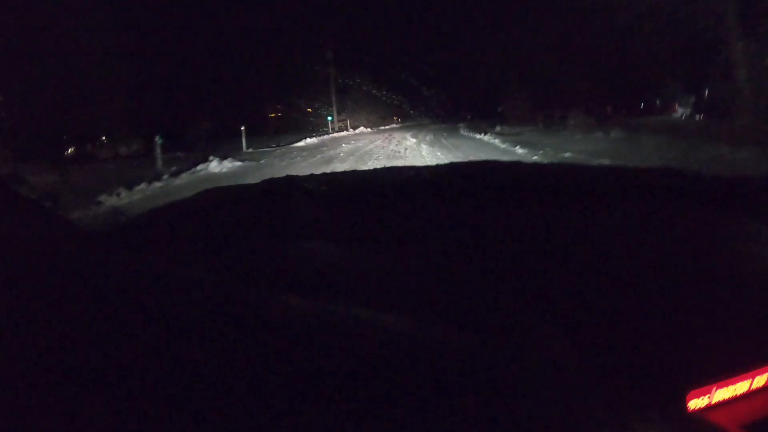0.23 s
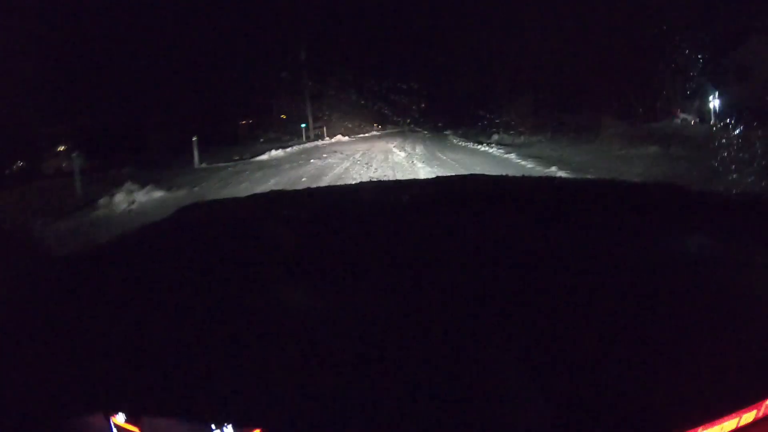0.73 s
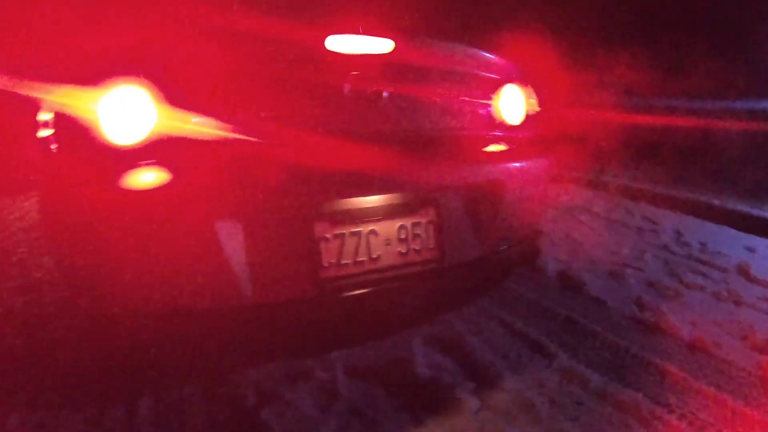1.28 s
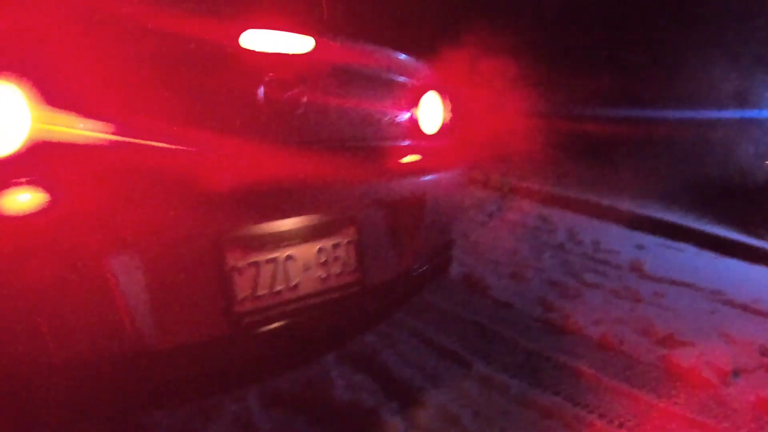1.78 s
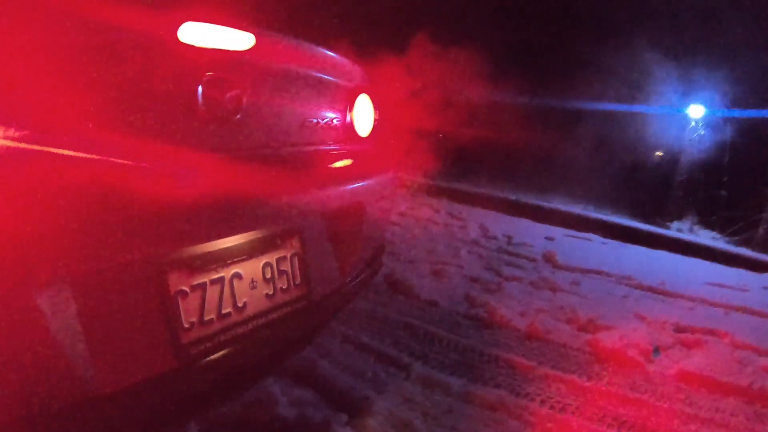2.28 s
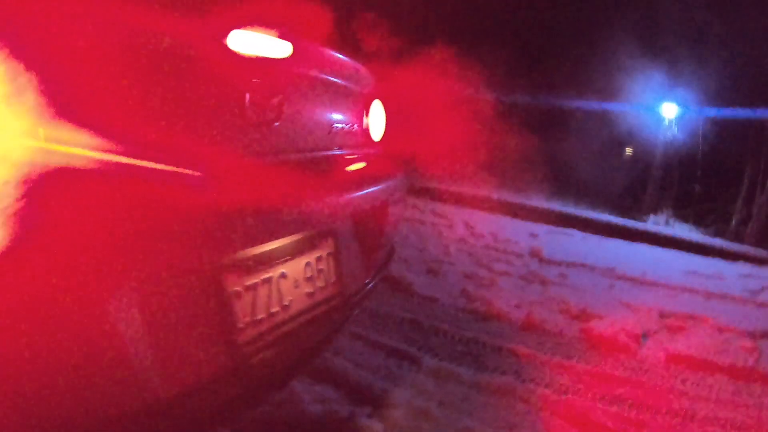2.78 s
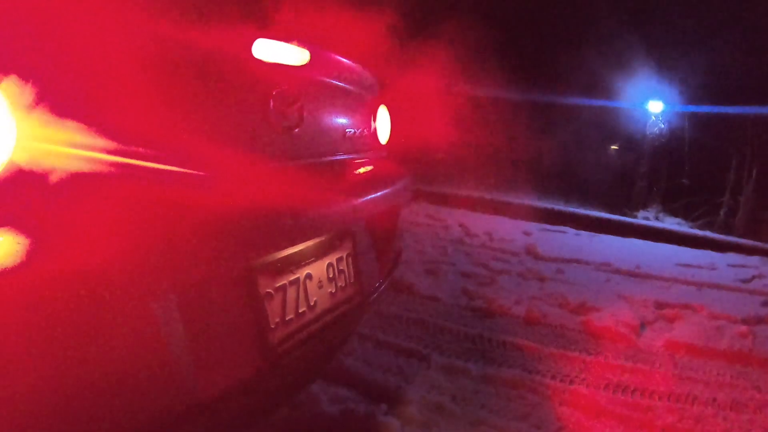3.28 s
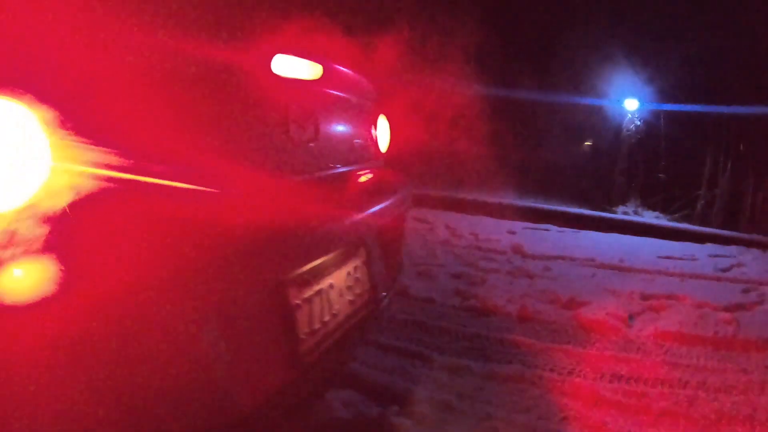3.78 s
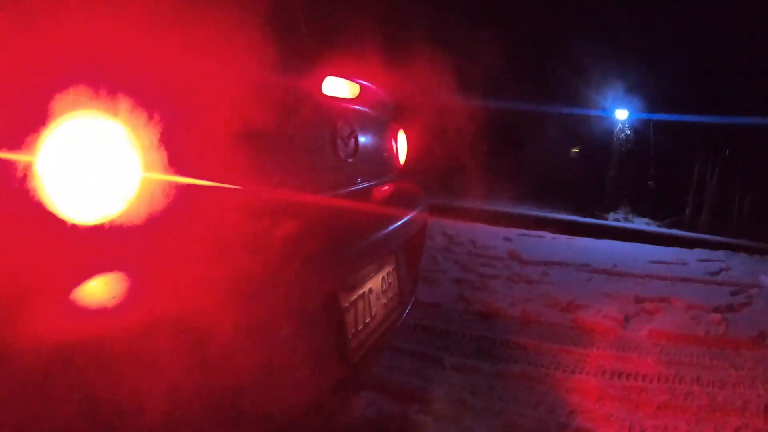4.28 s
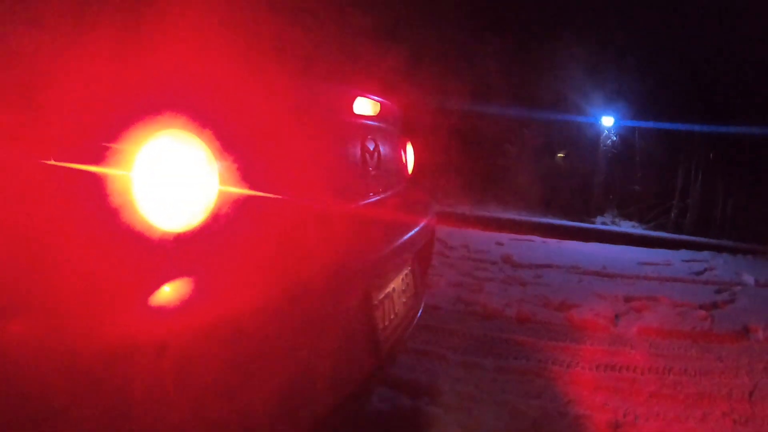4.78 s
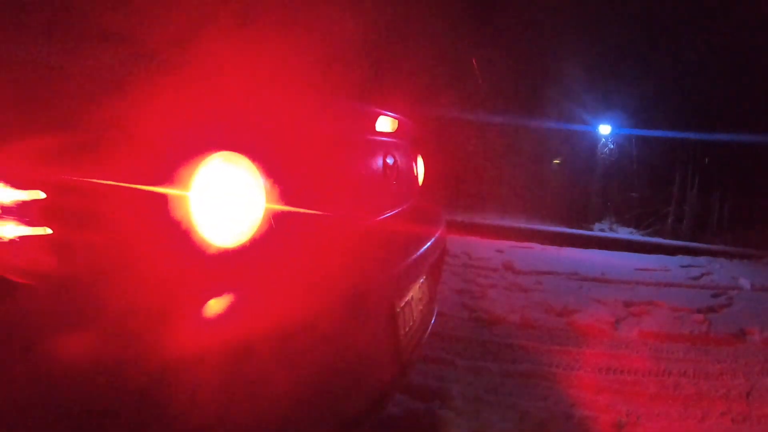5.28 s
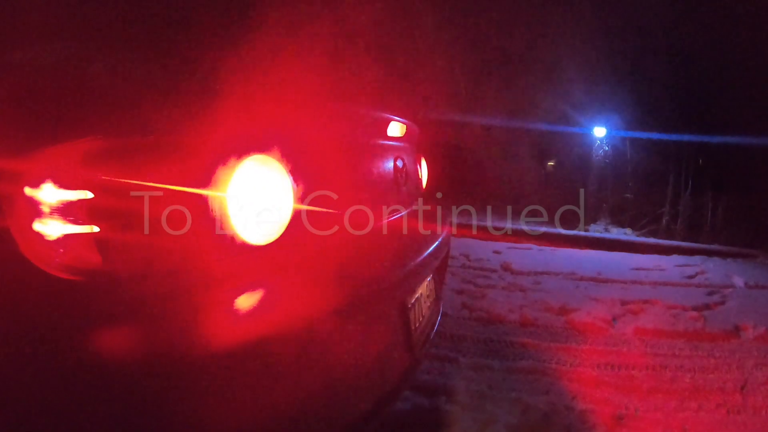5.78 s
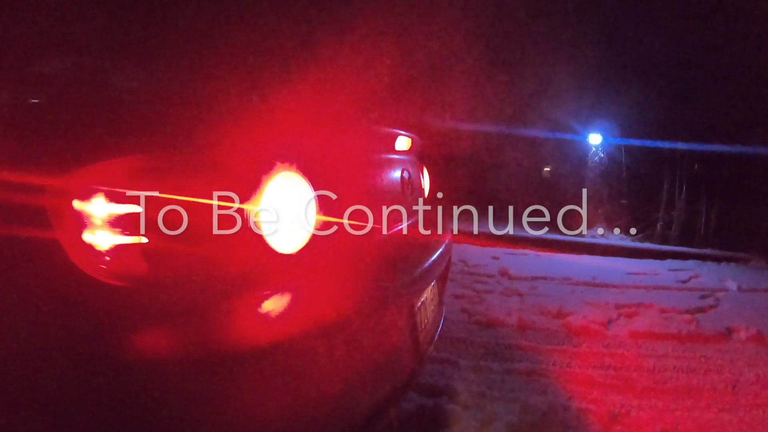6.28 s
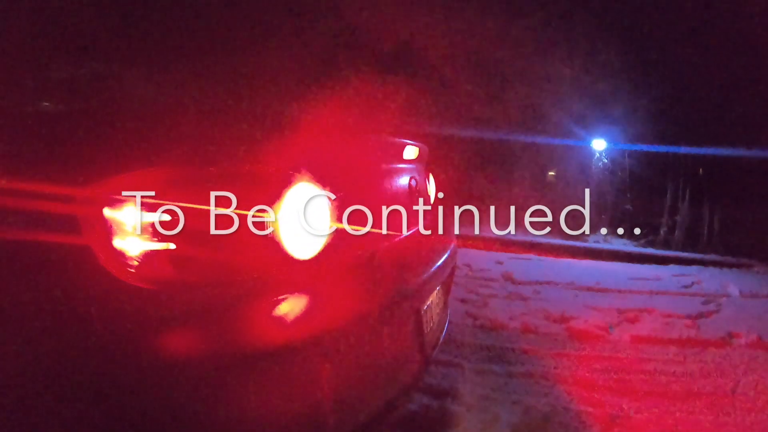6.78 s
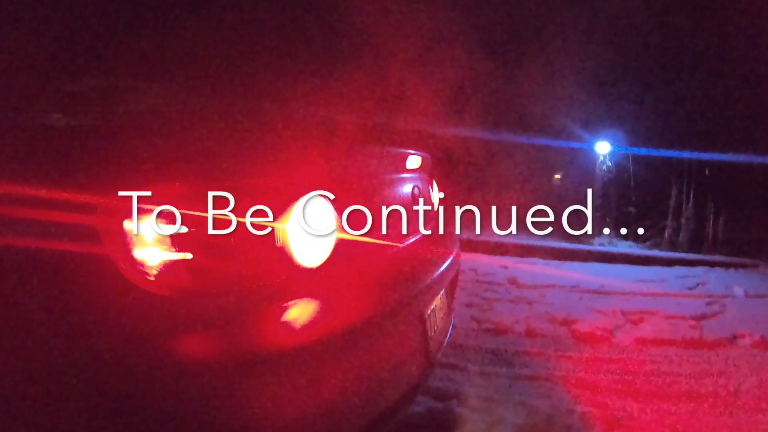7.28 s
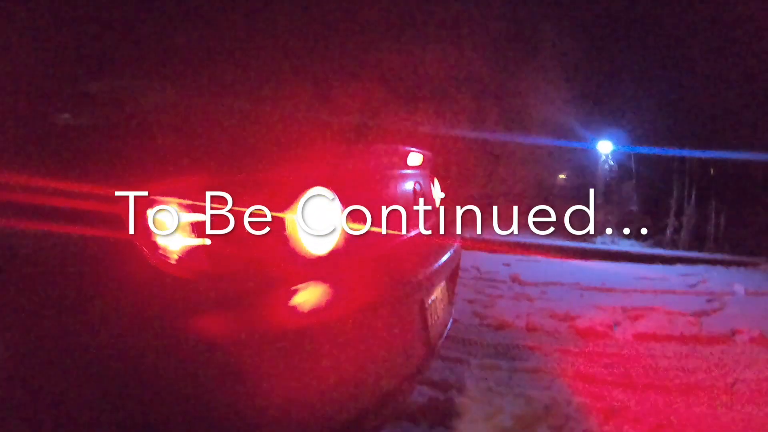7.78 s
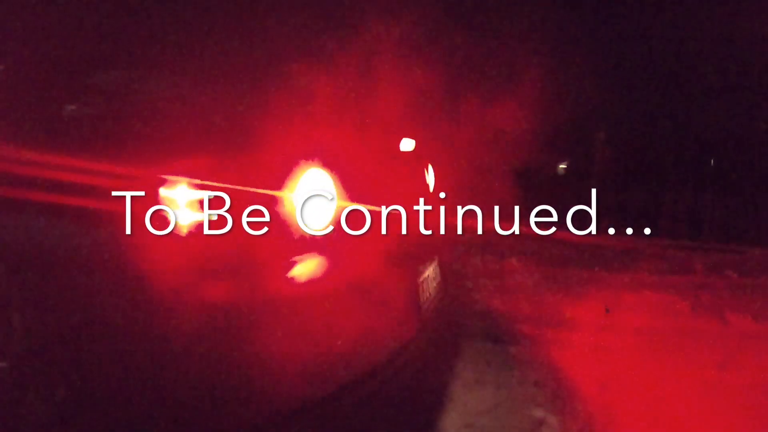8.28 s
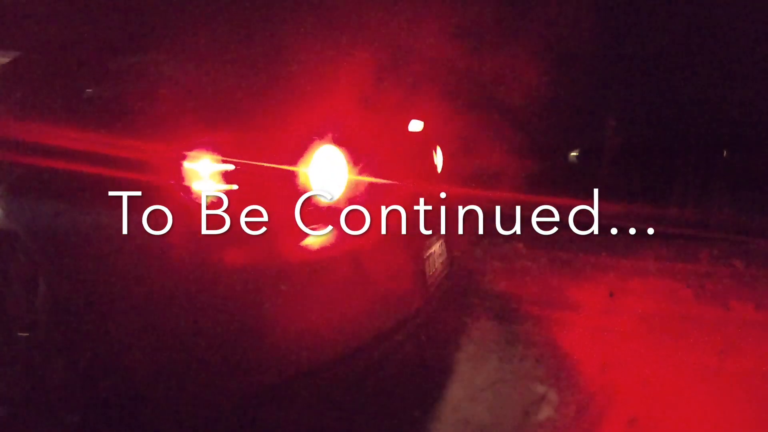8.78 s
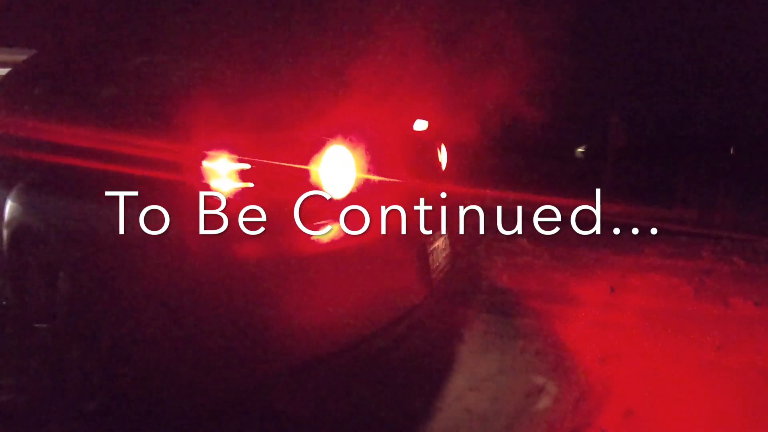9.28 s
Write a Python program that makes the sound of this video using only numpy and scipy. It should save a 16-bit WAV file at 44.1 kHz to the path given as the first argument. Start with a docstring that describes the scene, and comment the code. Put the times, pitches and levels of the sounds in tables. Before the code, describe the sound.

Low tyre rumble in a car cabin cuts to a close, throbbing idle at the tailpipes, with metallic ticking and microphone scuffs.

```python
"""One second of road rumble in a car's cabin on a snowy night, then a cut to its tail as it idles.
The rotary engine's strong and weak exhaust pulses alternate, ring the exhaust system and leave by two
tailpipes with a putt, a hiss and a metallic tick. The engine bay whirrs and whines behind them.
A hand-held camera is carried slowly round the rear corner, with scuffs and clicks by its right side."""
import sys
import numpy as np
from scipy import signal
from scipy.fft import rfft, irfft, next_fast_len
from scipy.io import wavfile

SR = 44100
rng = np.random.default_rng(int(sys.argv[2]) if len(sys.argv) > 2 else 0)


def bounce(signal):
    """Save signal as a 16-bit WAV file at the path given by the first command-line argument."""
    frames = np.transpose(np.atleast_2d(signal))
    limited = np.clip(frames, -1, 1)
    pcm = np.round(limited * 32767).astype(np.int16)
    wavfile.write(sys.argv[1], SR, pcm)


N = 420706
CUT_S = 1.0
TIME = np.arange(N) / SR
FFT_SIZE = next_fast_len(N + SR)
HZ = np.fft.rfftfreq(FFT_SIZE, 1 / SR)

# walk round the rear corner: time_s, progress_0_to_1
WALK = [(1.0, 0.02), (2.25, 0.18), (3.3, 0.42), (5.1, 0.73), (7.15, 0.8), (9.54, 0.96)]
# spectrum of rubbing and rattling: freq_hz, level_db
FRICTION_SPECTRUM = [(300, -35.5), (800, -5.5), (1600, -4), (3200, -2), (4500, -9), (10000, -17),
                     (11200, -33)]


def exhaust(times_s, gain_db=68.0, distance_db=-3.0, blowdown_s=0.0012, echo_s=0.003497):
    """Blowdowns ring the pipes. Along the walk the far outlet lags more, the bumper shades upper modes."""
    # standing waves: freq_hz, width_hz, behind_db, corner_db, outlet_polarity
    pipe_modes = [(42.9, 7.7, -21, -20.5, -1), (79.74, 16.2, -22, -24.5, -1), (93.7, 17.5, -19.5, -21.5, 1),
                  (136.23, 11.9, -6, -5.5, 1), (177.3, 10.15, -8.5, -12.5, -1),
                  (223.9, 13.8, -27, -26.5, -1), (279.4, 15, -44.5, -35.5, -1),
                  (309.7, 23.7, -28.5, -33.5, -1)]
    blowdown = 1 / (1 + 2j * np.pi * HZ * blowdown_s) ** 3
    silencer = 1 + 0.531 * np.exp(-2j * np.pi * HZ * echo_s)  # internal reflection
    modes = sum(polarity * amp([[behind_db], [corner_db]]) * resonance(hz, width_hz)
                for hz, width_hz, behind_db, corner_db, polarity in pipe_modes)
    behind, corner = filtered(blowdowns(times_s), blowdown * silencer * modes)
    walk = curve(WALK)
    near = behind + (corner - behind) * walk
    upper_db = 10 + 2.5 * distance() - 11 * walk
    near = near + (amp(upper_db) - 1) * filtered(near, highpass(260, order=12))
    far = delayed(near, lag_s=0.0019 + 0.0017 * walk)
    return amp(gain_db + distance_db * distance()) * (near + 0.8 * far)


def firings(first_s=1.0017, weak_phase=0.49, jitter_s=0.0001):
    """Firing times, one row a cycle: the strong pulse, then the weak one about halfway to the next."""
    # idle speed, rising a little and hunting: time_s, cycle_rate_hz
    idle = [(1.0, 12.344), (2.005, 13.094), (4.124, 13.576), (4.421, 13.438), (5.537, 13.888),
            (6.096, 13.631), (6.391, 14.027), (7.174, 13.858), (7.709, 14.038), (8.179, 13.878),
            (8.799, 14.089), (9.54, 13.897)]
    cycles = np.cumsum(curve(idle)) / SR
    cycles -= np.interp(first_s, TIME, cycles)
    firing_cycles = np.arange(int(cycles[-1]) + 1)[:, None] + [0, weak_phase]
    times_s = np.interp(firing_cycles, cycles, TIME)
    return times_s + jitter_s * rng.standard_normal(times_s.shape)


def pulses(times_s, weak_db, spread_db, putt_accent=0, hiss_accent=0):
    """One impulse a firing; the weak firings vary twice as much in dB."""
    # firings that stand out: time_s, putt_db, hiss_db
    accents = [(1.32, 1, -1), (1.4, 1.5, -1), (1.48, 5.5, -1), (1.87, -0.5, 2.5), (2.18, 8, 3.5),
               (3.53, 2, 4), (3.98, 3, 6), (4.64, 1, -0.5), (4.72, 4.5, 1), (4.86, 3, 3.3), (5.3, 4.5, 3.2),
               (5.44, 3, 4.5), (5.66, 2.5, 3.5), (5.73, 4.5, 6.5), (6.6, 2, 4), (7.1, 3, 1), (7.39, 0, 4),
               (7.46, 1.5, 4.5), (7.82, 2.5, 6), (7.89, 3.5, -2), (8.11, -2.5, 6), (8.32, 2.5, 3),
               (8.68, -1, 4.5), (9.4, -3, 0.5)]
    accent_db = sum((putt_accent * putt_db + hiss_accent * hiss_db) * (abs(times_s - time_s) < 0.015)
                    for time_s, putt_db, hiss_db in accents)
    scatter_db = spread_db * rng.uniform(-1.2, 1, times_s.shape) * [1, 2]
    heights = amp([0, weak_db] + accent_db + scatter_db)
    samples = np.round(times_s * SR).astype(int)
    return np.bincount(samples.ravel(), heights.ravel(), N)[:N] * (TIME < TIME[-100])


def blowdowns(times_s, weak_late_s=0.00059):
    """Gas volume drives the low modes, the steep front the upper ones; weak pulses carry less gas."""
    gas = pulses(times_s, weak_db=-5.0, spread_db=0.8, hiss_accent=0.28)
    fronts = pulses(times_s + [0, weak_late_s], weak_db=-5.5, spread_db=0.5, hiss_accent=0.33)
    return gas + filtered(fronts - gas, highpass(195, order=20))


def tailpipe_tips(times_s, level_db=-38.5, distance_db=-13.0, lead_s=0.0012, band_hz=(500, 825)):
    """Each pulse front rings the tips and returns once along the pipe: a putt, brighter from behind."""
    behind = 1 - passed(place=0.26, span=0.088)
    tip_hz = 585 + 55 * behind
    train = pulses(times_s - lead_s, weak_db=-12.0, spread_db=2.0, putt_accent=0.98)
    churn = puffs(train, rise_s=0.0033, decay_s=0.0054) * rng.standard_normal(N)
    putt = ring(train, tip_hz, width_hz=250) + amp(-12) * ring(churn, tip_hz, width_hz=260)
    putt -= amp(-19.5 + 17 * behind) * ring(train, hz=np.full(N, 785), width_hz=115)
    putt += amp(-24) * delayed(putt, lag_s=0.021)
    band = 1 / (1 + (band_hz[0] / (HZ + 1)) ** 16 + (HZ / band_hz[1]) ** 16)
    outlet = resonance(hz=670, width_hz=420) * band
    in_line_db = 1.5 * (passed(place=0.23, span=0.04) - passed(place=0.48, span=0.06))  # first outlet
    return amp(level_db + distance_db * distance() + in_line_db) * unit(filtered(putt, outlet))


def gas_jet(times_s, level_db=-56.0, in_line_db=6.5):
    """Gas hisses out with every pulse, louder once the camera is in line with the near outlet."""
    # outlet hiss: freq_hz, level_db
    hiss_spectrum = [(500, -16), (900, 11.5), (1500, -1.5), (2500, -4), (3800, -2), (4550, -6),
                     (5700, -4.5), (6800, -7.5), (7600, -10), (9000, -9), (10200, -12), (11000, -19.5),
                     (15000, -32)]
    # resonances rung by the hiss: freq_hz, width_hz, gain_db
    hiss_modes = [(4390, 270, -0.5), (4900, 280, 3.5), (7800, 480, -8)]
    train = pulses(times_s, weak_db=-10, spread_db=1.8, hiss_accent=1.0)
    flow = puffs(train, rise_s=0.001, decay_s=0.013) + 0.096 * puffs(train, rise_s=0.0018, decay_s=0.078)
    peaks = 1 + sum(amp(db) * abs(resonance(hz, width_hz)) ** 2 for hz, width_hz, db in hiss_modes)
    hiss = diffuse(amp(spectrum(hiss_spectrum)) * peaks)
    return amp(level_db + in_line_db * passed(place=0.88, span=0.069)) * unit(flow * hiss)


def metal_ticks(times_s, gain_db=-48.5, shade_db=-18.0, lags_s=(0.0006, 0.00025), mic_phase_rad=1.3):
    """Thin exhaust metal ticks and bounces with every pulse, each time in a different mix of modes."""
    # thin metal: freq_hz, width_hz, level_db
    metal_modes = [(4560, 200, 6), (4810, 220, 1.5), (5360, 450, -2.5), (6150, 570, -5), (7700, 930, -6.5),
                   (9600, 1100, -16.5)]
    train = pulses(times_s + lags_s, weak_db=-4.0, spread_db=3.1, hiss_accent=0.57)
    train += amp(-7) * delayed(train, lag_s=0.0081)  # bounce
    chatter = puffs(train, rise_s=0.0005, decay_s=0.0013) * diffuse(np.ones(len(HZ)))
    strikes = unit(train) + 0.75 * unit(chatter)
    mic_phases = np.exp(1j * np.array([[0], [mic_phase_rad]]))
    out = np.zeros((2, N))
    for hz, width_hz, db in metal_modes:
        share = np.interp(TIME, times_s.ravel(), amp(db + rng.uniform(-5, 5, times_s.size)))
        out += filtered(strikes * share, resonance(hz, width_hz) ** 2 * mic_phases)
    shade = 1.5 - passed(place=0.75, span=0.029)
    return amp(gain_db + shade_db * shade) * unit(out)


def silencer_shell(times_s, level_db=-54.5, walk_db=6.0, weak_late_s=0.0007, band_hz=390):
    """The firings keep the shell humming on the harmonics nearest its modes."""
    # low shell modes: freq_hz, width_hz, level_db
    shell_modes = [(365, 42, -1.5), (408.6, 21, 1)]
    modes = sum(amp(db) * resonance(hz, width_hz) for hz, width_hz, db in shell_modes)
    train = pulses(times_s + [0, weak_late_s], weak_db=-2.0, spread_db=0.5)
    band = 1 / (1 + ((HZ - band_hz) / 80) ** 8)
    return amp(level_db + walk_db * curve(WALK)) * unit(filtered(train, modes * band))


def engine_whirr(mid_band_db=-54.0, walk_db=4.0):
    """Steady machinery noise, louder as the side of the car comes into view."""
    # engine bay and churning gas: freq_hz, level_db
    whirr_spectrum = [(20, 12.5), (45, 15.5), (130, 20), (250, 9.5), (450, 5), (800, 2.5), (1100, -2),
                      (1600, -5.5), (2200, -10), (3200, -14.5), (5200, -19.5), (10000, -30.5), (11000, -42),
                      (15500, -50)]
    noise = diffuse(amp(spectrum(whirr_spectrum)))
    mid_band = filtered(noise[0], (HZ > 1000) & (HZ < 3500))
    return amp(mid_band_db + walk_db * curve(WALK)) * panned(2.0) * noise / mid_band.std()


def engine_whines(waver_db=2.0):
    """Narrow fuzzy tones that waver, each clearest from one place on the walk."""
    # engine tones: pitch_hz, width_hz, level_db, loudest_s, sigma_s
    tones = [(1138, 26, -54.5, 8.4, 1.6), (1453, 68, -48.5, 10.9, 2.06), (1620, 50, -56.5, 7.4, 1.1),
             (1404, 260, -54.5, 5.6, 1.2), (2736, 120, -61.5, 10, 4.6), (2760, 60, -69.5, 5.6, 0.62),
             (3447, 52, -64.5, 6.8, 1.3), (5240, 35, -67.5, 5.4, 0.59), (5215, 40, -67, 7.8, 1.0),
             (5534, 55, -67.5, 8.3, 0.82), (6240, 130, -72, 8.7, 2)]
    noise = diffuse(np.ones(len(HZ)))
    out = np.zeros((2, N))
    for hz, width_hz, db, loudest_s, sigma_s in tones:
        waver = amp(waver_db * wander(below_hz=5))
        tone = unit(waver * filtered(noise, resonance(hz, width_hz) ** 2))
        out += amp(db) * np.exp(-((TIME - loudest_s) / sigma_s) ** 2 / 2) * tone
    return out


def cabin_rumble(rumble_db=-20.5, boom_db=-27.0, crunch_boost_db=8.5, lump_db=1.5):
    """Tyres on snow and the engine boom through the body shell; the snow crunches in lumps."""
    # road rumble: freq_hz, level_db
    road_spectrum = [(20, 8.5), (42, 7.5), (75, 9.5), (130, -2), (210, -7.5), (280, -26), (370, -27.5),
                     (560, -36), (850, -41), (1300, -46.5), (2200, -54.5), (4400, -63.5), (9500, -72.5),
                     (13000, -101)]
    # sinking cabin boom: time_s, pitch_hz
    boom_pitch = [(.3, 138), (.7, 91.8)]
    rumble = amp(rumble_db) * unit(diffuse(amp(spectrum(road_spectrum))))
    crunch = filtered(rumble, highpass(300, order=8))
    lumps = amp(crunch_boost_db + lump_db * wander(below_hz=22))
    boom = amp(boom_db) * ring(rng.standard_normal(N), curve(boom_pitch), width_hz=30)
    return (rumble + (lumps - 1) * crunch + boom) * panned(-0.72)


def tyre_drone(level_db=-42.0, pitch_hz=355, loudest_s=0.17, half_s=0.26):
    """A hollow tyre drone swells and dies in the cabin as the car slows."""
    tone = ring(rng.standard_normal(N), np.full(N, pitch_hz), width_hz=110)
    return amp(level_db) * np.exp(-((TIME - loudest_s) / half_s) ** 2) * tone


def trim_rattles(per_s, level_db, hz, width_hz, decay_s):
    """Loose trim ticks or knocks at random as the car shakes."""
    train = (rng.random(N) < per_s / SR) * amp(rng.uniform(-5, 5, N))
    envelope = puffs(train, rise_s=0.0003, decay_s=decay_s)
    noise = diffuse(resonance(hz, width_hz) ** 2 * amp(spectrum(FRICTION_SPECTRUM)))
    return amp(level_db) * unit(envelope * noise)


def knocks_and_handling():
    """Dull knocks in the cabin, then camera clicks; brief squeaks and soft scuffs; mostly on the right."""
    # clicks and knocks: start_s, level_db, pan_db, ring_hz, tilt_db_per_oct, edge_hz
    clicks = [(0.18, -37, -4, 850, -14, 2000), (0.358, -30, 0, 875, -8, 2400),
              (0.679, -31.5, -6, 880, -9, 2400), (0.805, -30.5, -10, 850, -6, 2400),
              (0.841, -33, 0, 696, -8, 2200), (0.914, -35, -6, 680, -9, 2200),
              (0.944, -33, -10, 700, -7, 2200), (1.3287, -12.5, -4, 1540, 0, 2000),
              (1.3444, -17, -10, 1400, 2, 3200), (1.348, -19, -9, 2620, -1, 3300),
              (1.377, -15, -7, 800, -3, 2200), (1.383, -28, -5, 2600, 4, 3200),
              (1.387, -28, -8, 1500, -2, 2200), (1.411, -18.5, -8, 720, 1, 2700),
              (1.4399, -13, -8, 890, 1, 2500), (1.445, -26, -1, 3700, 7, 4500),
              (1.916, -22.5, -7, 1300, -10, 2000), (1.971, -8, -5, 560, -3, 2900),
              (1.986, -26, -4, 746, -6, 2200), (2.009, -15, -7, 684, -3, 2700),
              (2.056, -16, -6, 1050, -3.5, 1900), (2.263, -19, -12, 1470, 0, 2000),
              (2.901, -11.5, -12, 1240, 1, 2500), (2.9037, -16, -8, 850, 5, 2000),
              (3.628, -19.5, -8, 1590, 1.5, 2300), (3.704, -9.5, -13, 1480, -1.5, 1850),
              (3.714, -27, -7, 1100, -3, 2800), (3.723, -15.5, -6, 1120, -9, 1900),
              (3.7545, -14, -9, 710, -2, 1900), (3.759, -23, -5, 1150, 5, 1900),
              (3.803, -23, -12, 900, -2, 1600), (4.256, -29, -6, 1700, 3, 4500),
              (4.336, -26, -10, 1500, 1, 3200), (4.374, -23.5, -6, 650, -3, 2000),
              (4.445, -20, -5, 740, -6, 2000), (6.382, -10.5, -12, 1180, -1.5, 1800),
              (6.413, -22, -14, 1390, 10, 2000), (6.4432, -9.5, -20, 1580, -3.5, 2000),
              (6.445, -13.5, -6, 1070, -2.5, 1700), (6.985, -10.5, -12, 1150, -6, 1750),
              (7.189, -19, -13, 1480, -1, 2000), (7.194, -24, -11, 1500, 0, 2000),
              (7.24, -30, -18, 1700, 3, 2100), (7.2445, -12.5, -22, 1510, -3.5, 1900),
              (7.42, -22.5, -12, 930, -8, 1500), (8.218, -15, -12, 1700, -2, 1900),
              (8.232, -13, -10, 760, -2, 1900)]
    # high squeaks and rustles: centre_s, half_s, level_db, pan_db, ring_hz
    squeaks = [(.122, 0.02, -60, -1, 5500), (0.738, 0.015, -50.5, -5, 4250), (2.076, 0.023, -49, 3, 6950),
               (8.986, 0.018, -47, 6, 5860)]
    # sleeve or sole scuffs: centre_s, half_s, level_db, ring_hz, tilt_db_per_oct
    scuffs = [(1.304, 0.034, -36.5, 1700, -5.5), (1.311, 0.008, -33.5, 1700, -8.5),
              (1.402, 0.14, -52, 1500, 0), (1.895, 0.039, -44.5, 1210, -0.5), (2.001, 0.06, -50, 1940, -2),
              (3.579, 0.057, -44.5, 1420, -5.5), (3.743, 0.057, -48.5, 1390, -2.5),
              (4.263, 0.052, -43, 1630, -1), (4.45, 0.011, -35, 1290, -9), (6.425, 0.02, -49, 1510, 6)]
    out = np.zeros((2, N))
    for start_s, db, pan_db, ring_hz, tilt_db_per_oct, edge_hz in clicks:
        add(out, start_s - 0.005, amp(db + 1) * panned(pan_db) * click(ring_hz, tilt_db_per_oct, edge_hz))
    for centre_s, half_s, db, pan_db, ring_hz in squeaks:
        squeak = rub(half_s, ring_hz, tilt_db_per_oct=6.0, ring_gain=2.1)
        add(out, centre_s - 1 / 6, amp(db) * panned(pan_db) * squeak)
    for centre_s, half_s, db, ring_hz, tilt_db_per_oct in scuffs:
        add(out, centre_s - 1 / 6, amp(db) * panned(-5) * rub(half_s, ring_hz, tilt_db_per_oct))
    return out


def click(ring_hz, tilt_db_per_oct, edge_hz, decay_s=0.0015, tail_s=0.019, rebound_s=0.0022, shelf_db=-10):
    """A dry click or knock, 5 ms in, and its rebound; a softer contact has a lower edge_hz."""
    # colour of a click or knock: freq_hz, level_db
    click_spectrum = [(150, -30.5), (400, -7.5), (600, 1), (800, 4.5), (1100, 0.5), (1650, 3), (2250, 3),
                      (3000, -1.5), (4200, -9.5), (7000, -21.5), (10000, -21), (11500, -39.5)]
    t = TIME[:SR // 8] - 0.005
    age_s = np.maximum(t, 0)
    envelope = (t >= 0) * (np.exp(-age_s / decay_s) + 0.066 * np.exp(-age_s / tail_s))
    envelope += 0.4 * (t >= rebound_s) * np.exp(-abs(t - rebound_s) / decay_s)
    sound = burst(envelope, click_spectrum, tilt_db_per_oct, ring_hz, ring_gain=1.34, spread=0.6, snap=11)
    contact = 1 / (1 + (np.fft.rfftfreq(len(t), 1 / SR) / edge_hz) ** 12)
    sound = irfft(rfft(sound) * amp(shelf_db * (1 - contact)), len(t))
    return sound / abs(sound).max()


def rub(half_s, ring_hz, tilt_db_per_oct, ring_gain=1.6, grain_db=2.5):
    """A stroke that catches and slips as it swells and fades, centred in a third of a second."""
    t = TIME[:SR // 3] - 1 / 6
    grain = amp(grain_db * np.repeat(rng.standard_normal(len(t)), 64)[:len(t)])
    friction = burst(grain, FRICTION_SPECTRUM, tilt_db_per_oct, ring_hz, ring_gain, spread=0.93)
    return unit(friction) * np.exp(-(t / half_s) ** 2)


def burst(envelope, colour, tilt_db_per_oct, ring_hz, ring_gain, spread, snap=0):
    """Coloured stereo noise burst; snap adds an impulse at its peak, spread unrelated noise per side."""
    hz = np.fft.rfftfreq(len(envelope), 1 / SR)
    noise = rng.standard_normal((3, len(envelope))) * envelope
    noise[0, np.argmax(envelope)] += snap
    gain = amp(spectrum(colour, hz) + tilt_db_per_oct * np.log2(np.clip(hz, 300, 5000) / 1500))
    peak = 1 + ring_gain / (1 + 1j * (hz - ring_hz) / 160)
    return irfft(rfft(noise[0] + spread * noise[1:]) * gain * peak, len(envelope))


def diffuse(response):
    """Coloured noise at both microphones, alike in the bass and mostly unrelated in the treble."""
    # likeness of the two microphones: freq_hz, correlation
    coherence = [(20, 0.99), (250, 1), (600, 0.81), (1400, 0.23), (3000, 0.42), (15000, .2)]
    likeness = np.clip(spectrum(coherence), 0, 1)
    mid = filtered(rng.standard_normal(N), response * np.sqrt(1 + likeness))
    side = filtered(rng.standard_normal(N), response * np.sqrt(1 - likeness))
    return np.array([mid + side, mid - side])


def distance(settle_s=0.91):
    """1 where the camera starts, falling to 0 as it nears the bumper."""
    return np.exp(-np.maximum(TIME - CUT_S, 0) / settle_s)


def passed(place, span):
    """Smooth step from 0 to 1 as the walk passes a place."""
    return 0.5 + 0.5 * np.tanh((curve(WALK) - place) / span)


def puffs(train, rise_s, decay_s):
    """A rise and decay after each impulse."""
    t = TIME[:SR // 8]
    return signal.oaconvolve(train, (1 - np.exp(-t / rise_s)) * np.exp(-t / decay_s))[:N]


def ring(x, hz, width_hz):
    """Steep resonance whose centre follows the curve hz; rms 1."""
    carrier = np.exp(2j * np.pi * np.cumsum(hz) / SR)
    pole = np.exp(-np.pi * width_hz / SR)
    baseband = signal.lfilter([1], np.poly([pole, pole]), x / carrier + 1e-18)
    return unit((carrier * baseband).real)


def resonance(hz, width_hz):
    """Response of one damped mode, gain 1 at its centre."""
    return 1j * HZ * width_hz / (hz ** 2 - HZ ** 2 + 1j * HZ * width_hz)


def highpass(hz, order):
    return 1 / (1 + (hz / (HZ + 1)) ** order)


def filtered(x, response):
    return irfft(rfft(x, FFT_SIZE) * response, FFT_SIZE)[..., :N]


def wander(below_hz):
    return unit(filtered(rng.standard_normal(N), HZ < below_hz))


def delayed(x, lag_s):
    return np.interp(TIME - lag_s, TIME, x)


def curve(rows):
    """A time table at every sample."""
    return np.interp(TIME, *np.transpose(rows))


def spectrum(rows, hz=HZ):
    """A frequency table interpolated on a log axis."""
    row_hz, values = np.transpose(rows)
    return np.interp(np.log(hz + 1), np.log(row_hz + 1), values)


def panned(left_minus_right_db):
    gains = amp([[left_minus_right_db / 2], [-left_minus_right_db / 2]])
    return gains / gains.mean()


def add(mix, start_s, sound):
    part = mix[..., max(round(start_s * SR), 0):][..., :sound.shape[-1]]
    part += sound[..., :part.shape[-1]]


def amp(db):
    return 10 ** (np.asarray(db) / 20)


def unit(x):
    """Scales to rms 1."""
    return x / np.sqrt(np.mean(x ** 2) + 1e-20)


def scene(crossfade_s=0.01):
    """The cabin, then the idling car from behind."""
    times_s = firings()
    ticks = trim_rattles(per_s=24, level_db=-72, hz=5200, width_hz=3500, decay_s=0.003)
    knocks = trim_rattles(per_s=6, level_db=-73, hz=950, width_hz=2300, decay_s=0.0042)
    outside = exhaust(times_s) * panned(-0.78) + tailpipe_tips(times_s) * panned(-0.8)
    outside += gas_jet(times_s) + metal_ticks(times_s)
    outside += engine_whirr() + engine_whines() + silencer_shell(times_s)
    inside = cabin_rumble() + tyre_drone() + ticks + knocks
    fade = np.clip((TIME - CUT_S) / crossfade_s + 1, 0, 1)
    return (1 - fade) * inside + fade * outside + knocks_and_handling()


def record(dry, knee=0.76, headroom=0.14, cutoff_hz=15800):
    """Soft peak limiter, then a low-pass."""
    over = np.maximum(abs(dry) - knee, 0)
    limited = dry - np.sign(dry) * (over - headroom * np.tanh(over / headroom))
    lowpass = signal.firwin(511, cutoff_hz, window=("kaiser", 9), fs=SR)
    return signal.oaconvolve(limited, lowpass[None], "same")


dry = scene()
out = record(dry)
bounce(out)
```